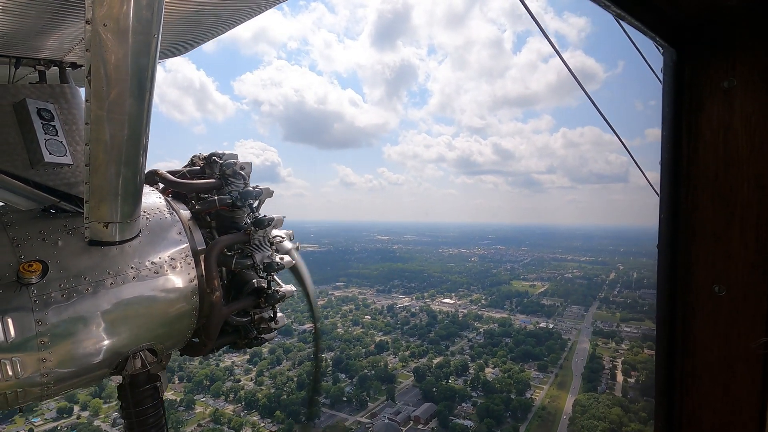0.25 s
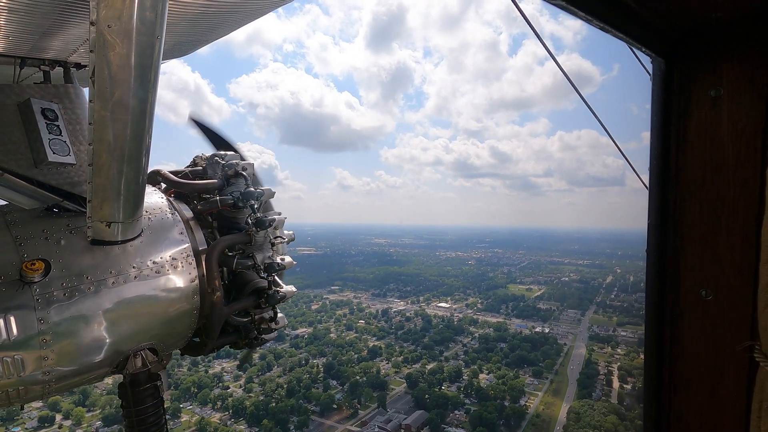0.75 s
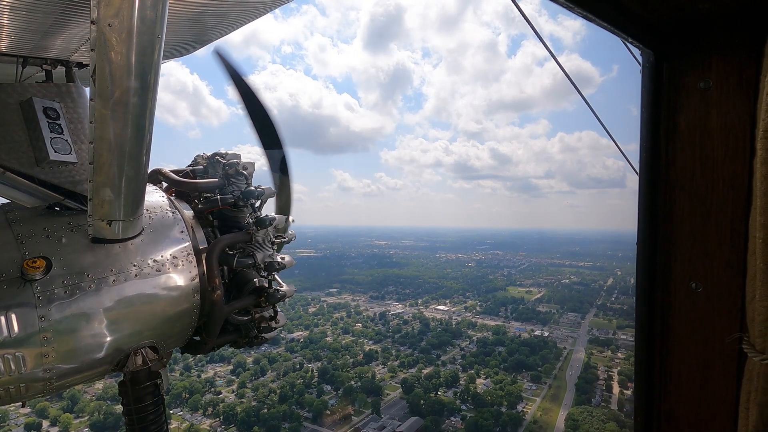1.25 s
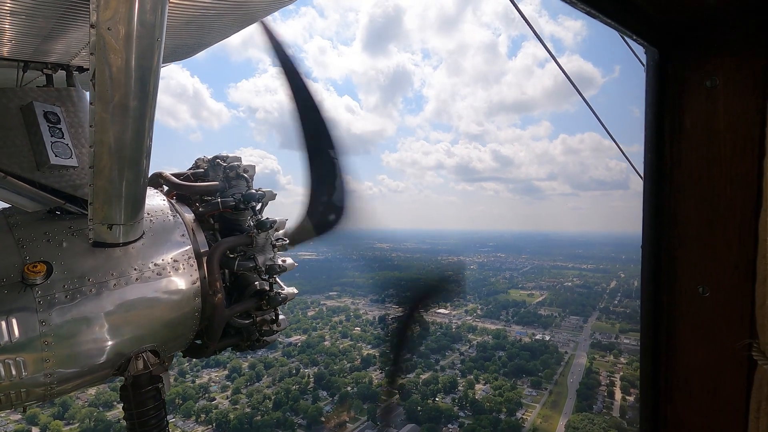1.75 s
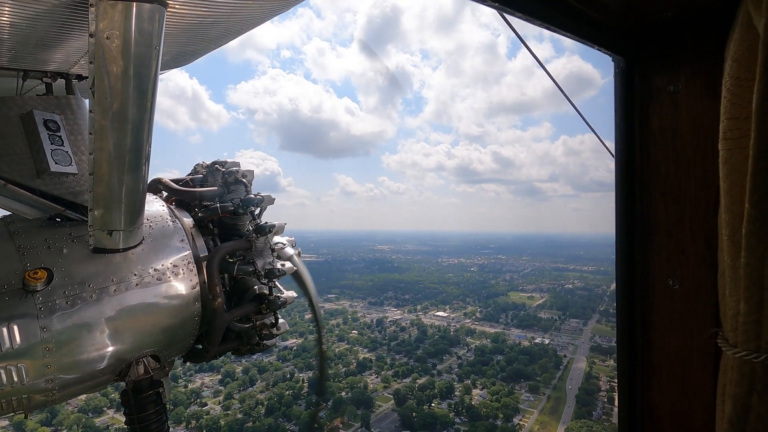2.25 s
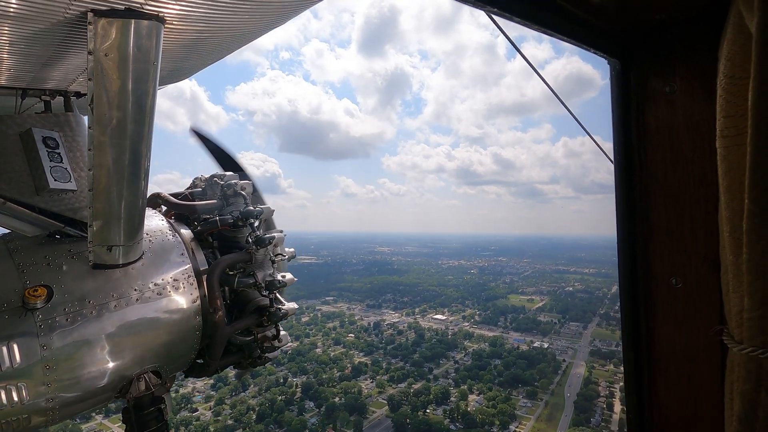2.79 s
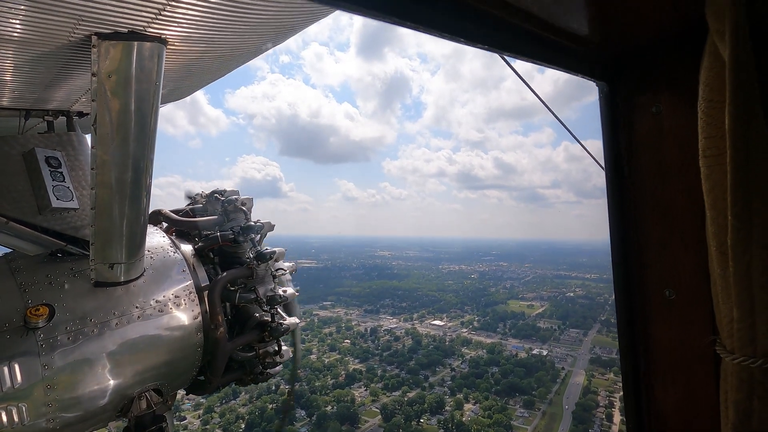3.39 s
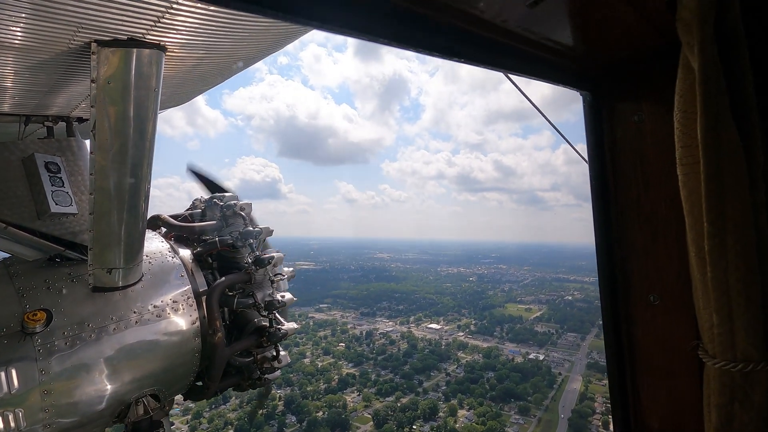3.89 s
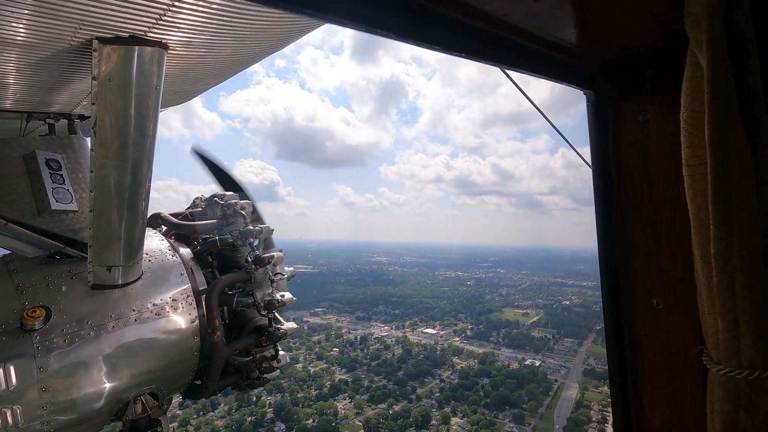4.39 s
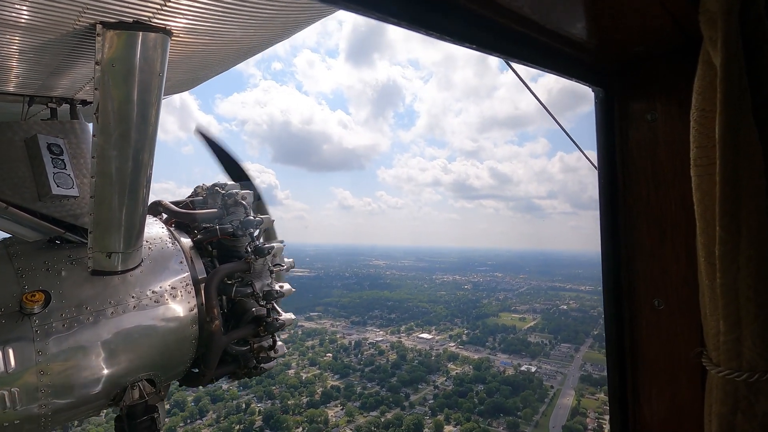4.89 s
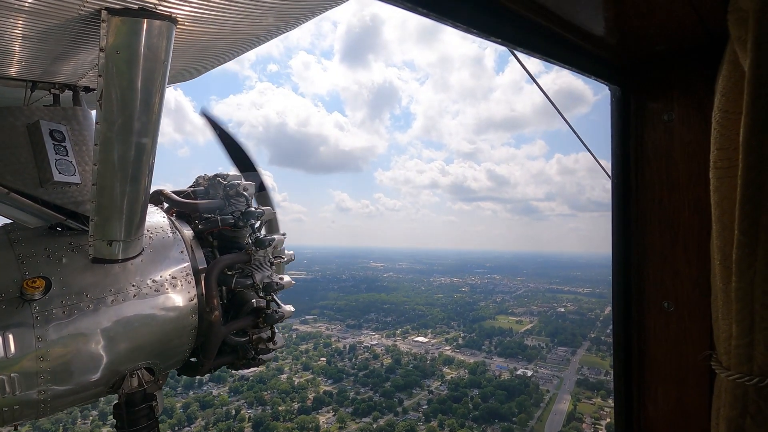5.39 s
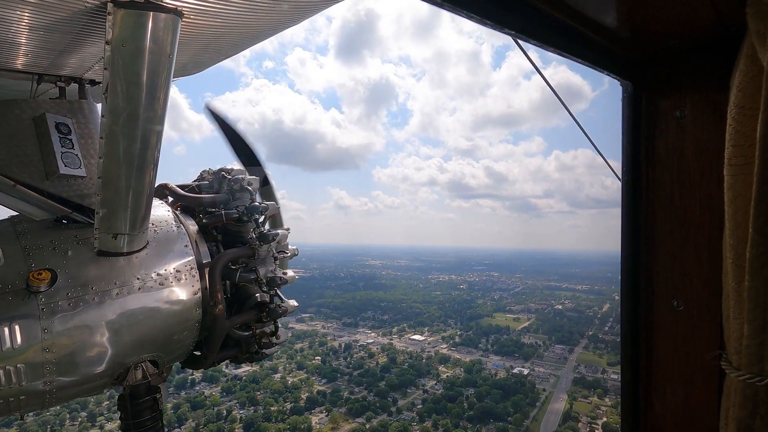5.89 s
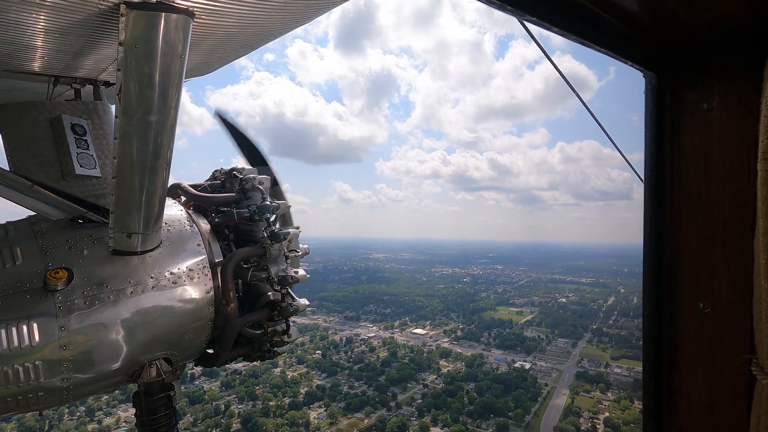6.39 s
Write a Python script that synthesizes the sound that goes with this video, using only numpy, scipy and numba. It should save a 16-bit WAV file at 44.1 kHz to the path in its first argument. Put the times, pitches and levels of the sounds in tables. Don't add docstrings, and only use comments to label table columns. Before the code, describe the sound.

Inside an old propeller plane in steady cruise, three radial engines drone loudly at slightly different speeds, so the deep hum slowly swells and sinks. Air chopped by the blades roars through thin metal skin. A loose panel ticks constantly and knocks now and then, most clearly around 1.6 seconds. A small stereo camera near the window captures it close and dense, keeping the level even.

```python
import sys
import numpy as np
from scipy import signal
from scipy.fft import rfft, irfft, next_fast_len
from scipy.io import wavfile
from scipy.ndimage import uniform_filter1d, minimum_filter1d
from numba import njit

SR = 44100
rng = np.random.default_rng(int(sys.argv[2]) if len(sys.argv) > 2 else 0)


def invert_db(x):
    u = np.asarray(x, float) / 20
    return 10 ** u


def int16_out(signal):
    q = np.round(np.clip(np.atleast_2d(signal).T, -1, 1) * 32767)
    wavfile.write(sys.argv[1], SR, q.astype(np.int16))


N = 293265
T = np.arange(N) / SR


def walk(rate):
    hold = int(SR / rate)
    steps = np.repeat(rng.standard_normal(N // hold + 1), hold)
    return 1.2 * uniform_filter1d(uniform_filter1d(steps, hold), hold)[:N]


def curves(table):
    s, *columns = np.transpose(table)
    return [np.interp(T, s, column) for column in columns]


# [t/s, near wing f/Hz, far wing f/Hz, nose f/Hz]
SHAFT_SPEED = [(0.0, 33.348, 33.566, 33.849), (0.51, 33.28, 33.542, 33.795), (1.02, 33.244, 33.452, 33.728),
               (1.53, 33.171, 33.363, 33.68), (2.05, 33.148, 33.351, 33.675),
               (2.56, 33.121, 33.336, 33.645), (3.07, 33.123, 33.33, 33.644), (3.58, 33.09, 33.294, 33.574),
               (4.09, 33.057, 33.243, 33.512), (4.6, 33.014, 33.19, 33.474), (5.12, 33.004, 33.192, 33.489),
               (5.63, 32.995, 33.179, 33.477), (6.14, 32.944, 33.204, 33.452), (6.65, 33.0, 33.229, 33.478)]


def shaft_turns():
    return [np.cumsum(hz) / SR for hz in curves(SHAFT_SPEED)]


# [t/s, share of the swing/0-1]
CAMERA_SWING = [
    (0.0, 0.0),
    (1.0, 0.2),
    (1.9, .3),
    (2.3, .55),
    (3.2, .7),
    (4.0, 1.0),
    (5.0, .9),
    (6.65, .65),
]
# [t/s, level/dB]
SWELLS = [(0.0, -1), (.6, 0.4), (1.0, -0.9), (1.4, 0), (1.6, -.1), (1.85, 1.8), (2.3, -1.5), (2.7, -0.5),
          (3.05, 0.6), (3.45, -1.2), (3.85, 0.7), (4.3, 1.8), (4.8, -2.4), (5.3, 0.3), (5.7, 0.5), (6.0, -1),
          (6.3, 0), (6.65, 1.2)]


def layer_levels():
    swing, swell_db = curves(CAMERA_SWING)[0], curves(SWELLS)[0]
    halfway = np.sin(np.pi * swing) ** 2
    swing_db = (-5, -3.2, 0.8, 6.5, 0.2)
    halfway_db = (0.5, -0.7, -2.5, 1.5, -0.1)
    swell_share = (.7, 1.1, 0.86, .8, 1.35)
    levels = []
    for whole_db, extra_db, share in zip(swing_db, halfway_db, swell_share):
        db = whole_db * swing + extra_db * halfway + share * swell_db
        levels.append(db - np.mean(db))
    return swell_db, levels


# [multiple of shaft speed, near level/dB, far level/dB, far meets near in step t/s]
BLADES = [(2, -22.5, -25.5, 4.7), (4, -15.5, -20, 3.211), (6, -21.5, -23.5, 3.08), (8, -25.5, -22, 2.819),
          (10, -35.5, -37.5, 2.547), (12, -34.5, -36, 2.533), (14, -45.5, -38, 2.66), (16, -40, -46, 2.685),
          (20, -41.5, -54.5, 2.594), (22, -50, -42.5, 2.669), (26, -37, -61.5, 2.527),
          (28, -54.5, -46, 2.563)]
# [multiple, near level/dB, far level/dB, in step t/s]
CYLINDERS = [(1, -40.5, -54, 4.9), (3.5, -30, -32, 3.11), (4.5, -26.5, -37.5, 2.908), (5, -42, -46, 2.901),
             (5.5, -36, -37.5, 3.08), (6.5, -58.5, -40.5, 2.866), (7, -36, -43, 3.08),
             (7.5, -38, -34, 3.01), (8.5, -39.5, -55.5, 2.583), (10.5, -37, -45, 2.898),
             (11.5, -35.5, -51.5, 2.7)]
# [multiple of shaft speed, level/dB, in step with the near engine t/s]
NOSE = [(1, -34.5, 4.244), (2, -28, 3.26), (2.5, -42, 2.832), (3.5, -40.5, 2.62), (4.5, -25, 2.774),
        (5.5, -36, 2.561), (6.5, -37, 2.627), (8, -33, 2.582), (8.5, -38.5, 2.669), (9, -37.5, 2.558),
        (10, -37, 2.639), (10.5, -38.5, 2.628), (14.5, -41, 2.631)]


def tones():
    wings = BLADES + CYLINDERS
    rows = [(k, 0, near_db, 0) for k, near_db, _, _ in wings]
    rows += [(k, 1, far_db, s) for k, _, far_db, s in wings]
    rows += [(k, 2, db, s) for k, db, s in NOSE]
    rows = [(np.round(2 * k) / 2, *rest) for k, *rest in rows]
    listed = {row[:2] for row in rows}
    multiples = np.r_[np.arange(1, 17, .5), np.arange(18, 31, 2)]
    chance = rng.standard_normal((len(multiples), 3))
    for k, c in zip(multiples, chance):
        for engine in range(3):
            if (k, engine) not in listed:
                faint_db = -47 - 0.3868 * k + 3.0 * c[engine]
                rows.append((k, engine, faint_db, engine + abs(c[0])))
    return rows


# [left minus right level/dB per kHz, left lag/ms]
SEATS = [
    (2, 0.12),
    (2.5, 0.069),
    (1.5, 0.15),
]


def engines(turns, pane_db):
    wobble_db, sway = .36, .03
    out = np.zeros((2, N))
    starts = rng.random(size=64)
    for k, engine, level_db, meet_s in tones():
        shaft, (pan_db, lag_ms) = turns[engine], SEATS[engine]
        pane_share = np.exp(-(k - 26) ** 2 / 2) + .25 * (11 < k < 19) - .3 * (19 < k < 23)
        ahead = np.interp(meet_s, T, shaft - turns[0])
        rough = 1 + max(-25 - level_db, 0) / 8
        phase = 2 * np.pi * (k * (shaft - ahead) + starts[int(2 * k)]) + sway * rough * walk(9)
        size = np.sqrt(2) * invert_db(pane_db * pane_share) * invert_db(level_db + wobble_db * rough * walk(7))
        tone = size * np.exp(1j * phase)
        khz = k * SHAFT_SPEED[0][1] / 1000
        port = invert_db(pan_db * khz / 2) * np.exp(-1j * np.pi * khz * lag_ms)
        out += [(tone * port).real, (tone / port).real]
    return out


# [multiple of shaft speed, level/dB]
WHINE = [(17, -52), (19, -56.5), (21, -52), (23, -54.5), (34, -52), (36, -49), (39, -47.5), (60, -60),
         (65.5, -61.5)]


def whine(near_turns):
    out = np.zeros((2, N))
    side_db = np.array([[1.5], [-1.5]])
    for multiple, db in WHINE:
        phase = 2 * np.pi * (np.round(2 * multiple) / 2 * near_turns + rng.random()) + .3 * walk(6)
        out += np.sqrt(2) * invert_db(db + 2.8 * walk(3) + side_db) * np.cos(phase)
    return out


# [f/Hz, level/dB per Hz]
ROAR = [(20, -60), (50, -55.5), (92, -56.5), (200, -52.5), (330, -53), (450, -59), (800, -62),
        (1500, -67.5), (1800, -72.5), (2500, -70.5), (3200, -79.5), (7700, -87.5), (8200, -93),
        (14500, -116)]
# [f/Hz, width/Hz, lift level/dB]
PANELS = [(1267, 402, 9.5), (1967, 120, 5), (2280, 250, 2), (4836, 79, 4.5), (7400, 60, 1),
          (12000, 1100, 4.5), (430, 50, -1.5), (1480, 140, -2.5), (733, 60, -3), (950, 35, -1),
          (2520, 120, -3), (9300, 1300, 2)]
# [f/Hz, likeness/0-1, left minus right level/dB, left lag/radians]
PORTS = [(60, .999, .5, .03), (250, .98, 1, .2), (520, .78, 1.6, .4), (1100, .84, 4, .6),
         (2200, .8, 3.2, .6), (4500, .68, 2.6, .5), (6500, .5, 3, .4), (8500, .25, 6.5, .3),
         (12000, .5, .2, .1)]


def skin_roar(hz, size):
    octave = np.log2(hz)
    roar_hz, roar_db = np.transpose(ROAR)
    db = np.interp(octave, np.log2(roar_hz), roar_db)
    db += sum(lift / (1 + (2 * (hz - f) / width) ** 2) for f, width, lift in PANELS)
    ripple = uniform_filter1d(uniform_filter1d(rng.standard_normal(len(hz)), size=200), size=200)
    db += .7 * ripple / ripple.std() * (hz > 900)
    port_hz, alike, pan_db, lag = np.transpose(PORTS)
    columns = (np.clip(alike, 0, 1), pan_db, lag)
    alike, pan_db, lag = (np.interp(octave, np.log2(port_hz), c) for c in columns)
    mid, side = rfft(rng.standard_normal((2, size))) * invert_db(db) * np.sqrt(SR / 2)
    mid, side = mid * np.sqrt((1 + alike) / 2), side * np.sqrt((1 - alike) / 2)
    port = invert_db(pan_db / 2) * np.exp(-.5j * lag)
    return np.array([(mid + side) * port, (mid - side) / port])


def blade_wakes(turns):
    near, far, nose = (2 * np.pi * t for t in turns)
    chop = np.cos(2 * near) + np.cos(4 * near) + .5 * np.cos(2 * far)
    throb = np.cos(near) + 0.55 * np.cos(nose / 2)
    return .11 * chop + .05 * throb


def slipstream(turns, roar_db):
    size = next_fast_len(N)
    hz = np.maximum(np.arange(size // 2 + 1) * SR / size, 1)
    octave = np.log2(hz)
    both = skin_roar(hz, size)
    wakes = blade_wakes(turns)
    out, gust, shiver = 0, walk(1.5), walk(16)
    for centre in np.arange(4, 14.4, 1 / 3):
        share = np.cos(np.pi / 2 * np.clip(3 * (octave - centre), -1, 1)) ** 2
        part = np.interp(centre, (10.4, 10.9, 11.4, 11.65, 11.75, 12), (0, 1, 1, 2, 2, 3))
        level_db = sum(max(1 - abs(part - i), 0) * db for i, db in enumerate(roar_db))
        level_db = min(max(centre - 8.0, 0) / 2, 1) * level_db
        level_db = level_db + (centre > 11.9) * 0.7 * shiver
        level_db = level_db + 0.29 * gust + 0.5 * walk(14) + (centre > 10.5) * .45 * walk(3)
        reach = np.interp(centre, (7.5, 9.5, 10.5, 12), (0, 1, .8, .3))
        out = out + irfft(both * share, size)[:, :N] * invert_db(level_db) * (1 + reach * wakes)
    return out


# [t/s, peak level/dB]
KNOCKS = [(0.4276, -20), (0.753, -19.5), (1.0255, -19), (1.54, -21), (1.6197, -14), (1.694, -12.5),
          (2.06, -22), (2.4214, -20), (3.829, -23), (3.889, -18), (4.791, -20), (4.9686, -28),
          (5.7857, -19.5), (6.2456, -16.5)]


def rattle(panel_db):
    ticks_per_s, tick_db, scatter_db = 45, -42, 3.0
    ticks = rng.random(N) < ticks_per_s / SR
    blows = ticks * invert_db(tick_db + panel_db + scatter_db * rng.exponential(size=N))
    for s, db in KNOCKS:
        blows[int(s * SR)] += invert_db(db - 5.0)
    t = T[:2000]
    ring = 0
    # f/Hz, level/dB, time to fade by 60 dB/s
    for f, db, t60 in [(1202, 1.5, .05), (1324, 5, 0.039), (2260, -14.5, 0.025),
                       (4800, -23.5, 0.033), (8200, -26, .006)]:
        fade = np.exp(-np.log(1000) * t / t60) * (1 - np.exp(-t / .002))
        ring = ring + invert_db(db) * np.sin(2 * np.pi * f * t) * fade
    return signal.fftconvolve(blows, ring)[:N] * invert_db(np.array([[2.0], [-2.0]]))


def scene():
    turns = shaft_turns()
    swell_db, (pane_db, *roar_db) = layer_levels()
    drone = engines(turns, pane_db) + whine(turns[0])
    drone *= invert_db(0.5 * swell_db)
    return drone + slipstream(turns, roar_db) + rattle(roar_db[0])


@njit
def follow(x, attack, release):
    y, level = np.empty(len(x)), np.mean(x[:4000])
    for i in range(len(x)):
        level += (x[i] - level) * (attack if x[i] > level else release)
        y[i] = level
    return y


def gain_control(dry):
    bass = signal.sosfiltfilt(signal.butter(2, 700, fs=SR, output="sos"), dry)
    deep = signal.sosfiltfilt(signal.butter(3, 90, fs=SR, output="sos"), dry)
    sensed = bass + invert_db(2) * deep
    span = int(.05 * SR)
    loud = np.sqrt(uniform_filter1d(uniform_filter1d(np.mean(sensed ** 2, axis=0), span), span))
    attack_s, release_s = 0.16, .04
    loud = follow(loud, 1 / (attack_s * SR), 1 / (release_s * SR))
    treble_gain = (loud.mean() / loud) ** .05
    bass_gain = (invert_db(-9.5) / loud) ** .52
    return treble_gain * (dry - bass) + bass_gain * bass


def limiter(x):
    peak = -minimum_filter1d(-np.abs(x).max(axis=0), size=265)
    attack_s, release_s = .001, .025
    peak = follow(peak, 1 / (attack_s * SR), 1 / (release_s * SR))
    return x * invert_db(.5) * np.minimum(.6 / peak, 1) ** .6


def roll_off(x):
    return signal.sosfilt(signal.butter(12, 15100, fs=SR, output="sos"), x)


def record(dry):
    held = gain_control(dry) * invert_db(np.array([[.17], [-.17]]))
    fade_in = np.minimum(.2 + T / .001, 1)
    fade_out = np.sin(np.pi / 2 * np.minimum(T[::-1] / .0008, 1))
    mix = limiter(held * fade_in * fade_out)
    return roll_off(mix)


dry = scene()
out = record(dry)
int16_out(out)
```